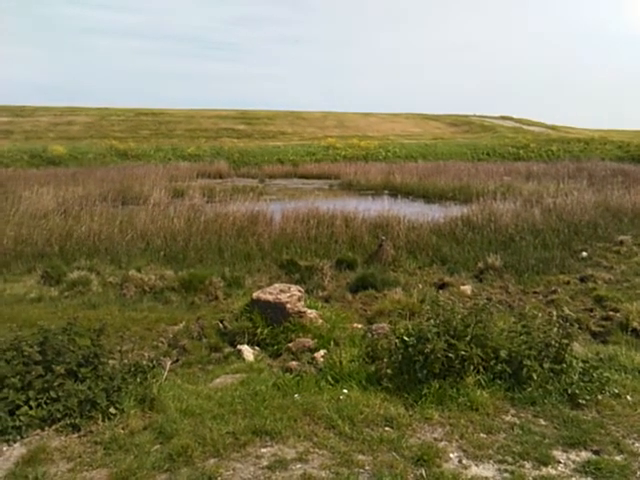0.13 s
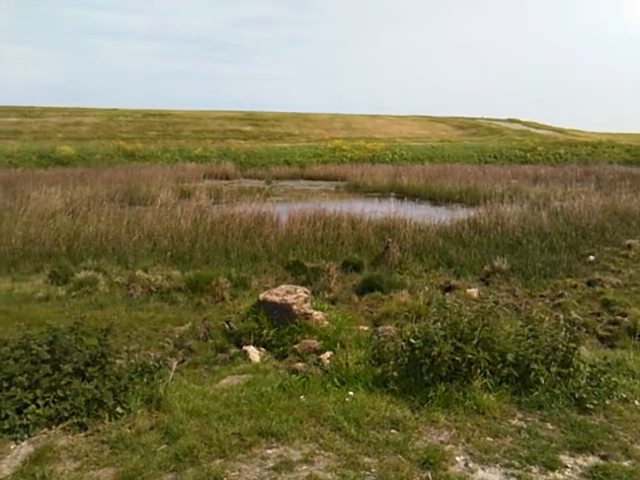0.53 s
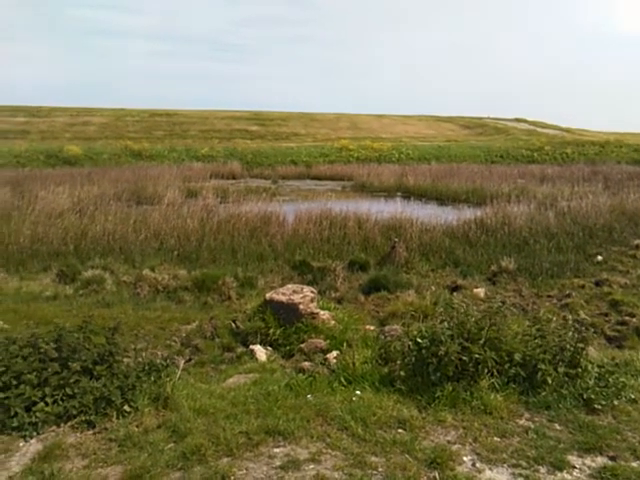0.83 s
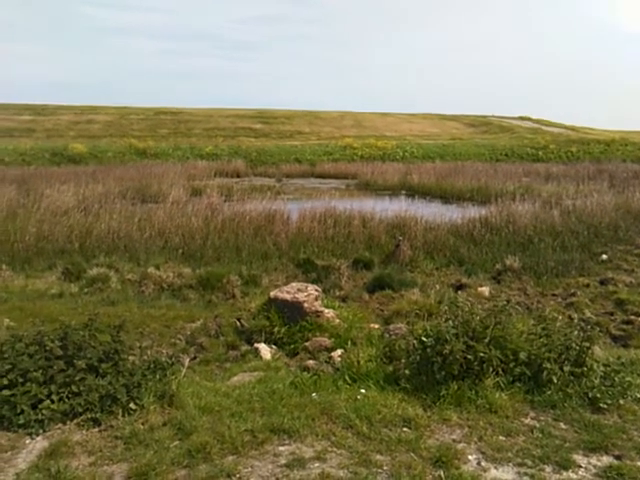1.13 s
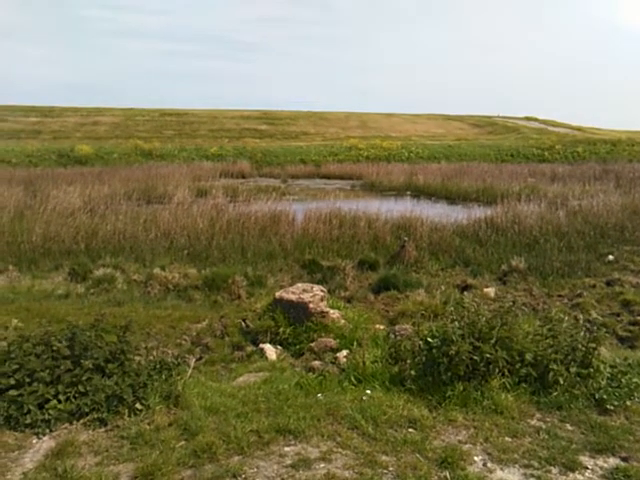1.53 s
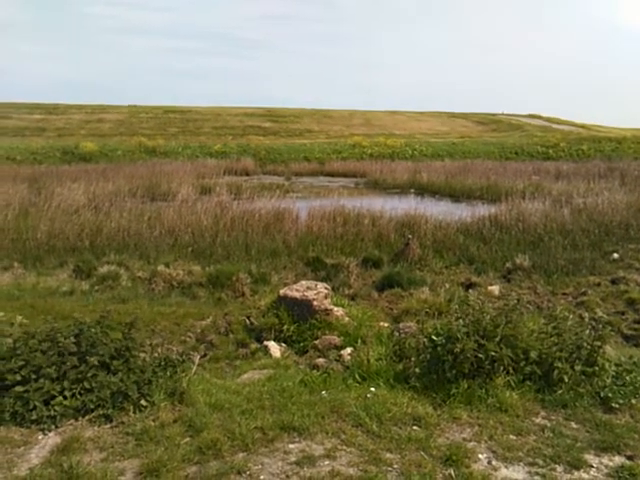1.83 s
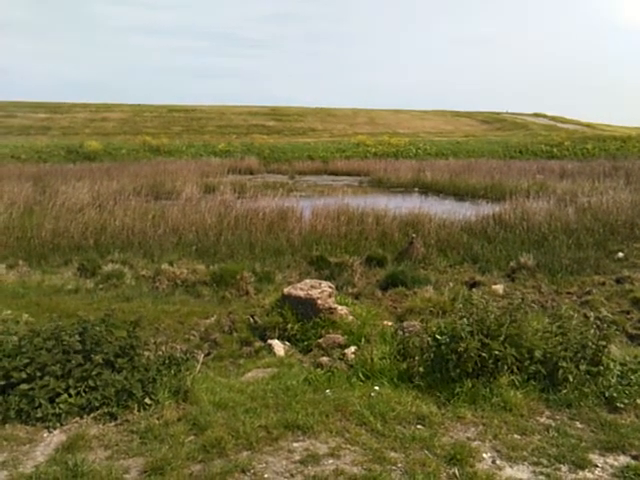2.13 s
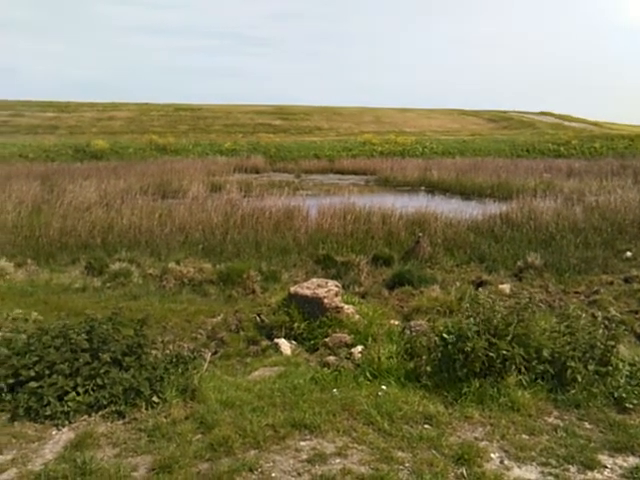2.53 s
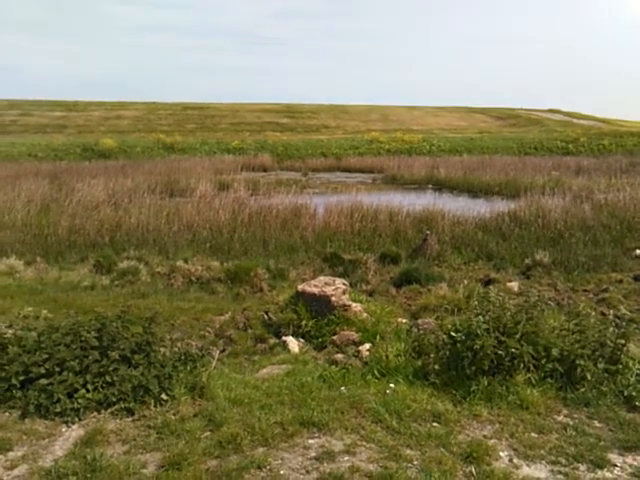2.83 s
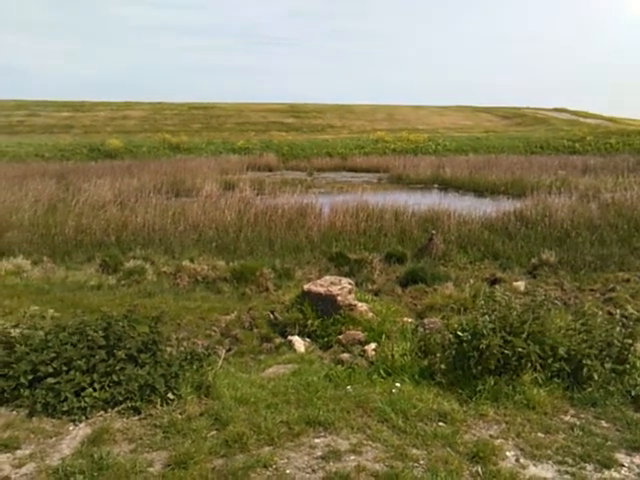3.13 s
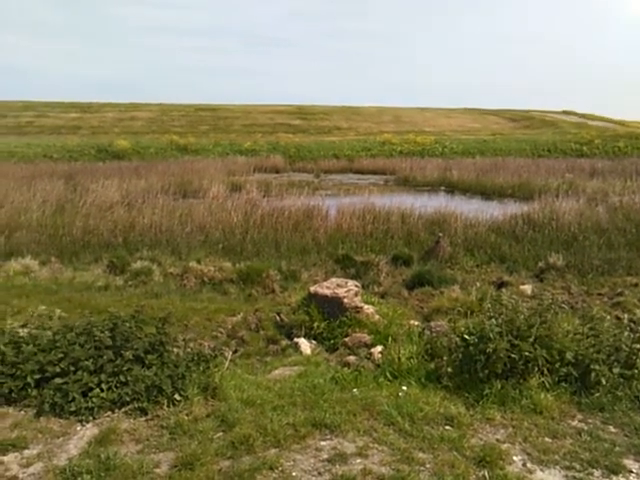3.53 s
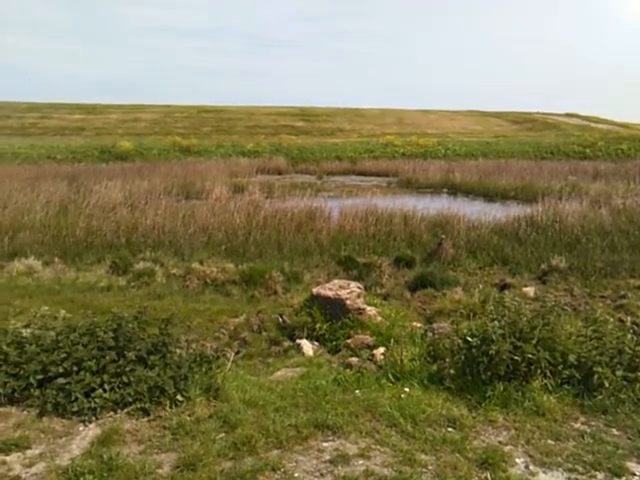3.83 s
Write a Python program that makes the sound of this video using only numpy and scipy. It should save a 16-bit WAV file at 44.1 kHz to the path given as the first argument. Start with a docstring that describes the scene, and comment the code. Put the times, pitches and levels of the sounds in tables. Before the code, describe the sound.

Frogs call at a marsh pond over a faint distant chorus, while loud wind rumbles and thumps on the microphone throughout, cracking at the start and at 0.8 seconds. Short quacks fill the first second and return around 3. Harsh, swelling croaks begin at 0.6 seconds, strongest and stuttering from 1.3 to 2.5. A bird whistles faintly near 2.1, 3.1 and 3.9 seconds, with faint rapid ticks around 3.7.

```python
"""Marsh frogs at a reedy pond, heard from a microphone out in the wind. Gusts buffet it from the start and
crack into overload twice in the first second, over a faint, distant chorus. Nearer frogs give a run of
short quacks, then longer croaks that swell and break into stutters: larynx pulses ringing the vocal sacs.
From two seconds on a small bird whistles thinly, and near the end comes a short run of faint ticks."""
import sys
import numpy as np
from scipy import signal
from scipy.fft import rfft, irfft
from scipy.io import wavfile
from scipy.ndimage import uniform_filter1d, minimum_filter1d, map_coordinates

SR = 44100
rng = np.random.default_rng(int(sys.argv[2]) if len(sys.argv) > 2 else 0)


def generate_wav(signal):
    """Clip the signal to [-1, 1] and save it as 16-bit WAV at the path in sys.argv[1]."""
    frames = np.transpose(np.atleast_2d(signal))
    scaled = np.clip(frames, -1, 1) * 32767
    pcm = np.round(scaled).astype(np.int16)
    wavfile.write(sys.argv[1], SR, pcm)


N = 176400

# Sharp blows of wind on the microphone. Each row: start in seconds, relative level in dB.
BUFFET_HITS = [(0.016, 2.5), (0.103, -15), (0.282, -11.5), (0.368, -10.5), (0.4, -15.5), (0.432, -29.5),
               (0.491, -19), (0.55, -15), (0.719, -16), (0.775, -21.5), (0.835, -9.5), (0.995, -12),
               (1.075, -18), (1.314, -12.5), (1.698, -10.5), (1.817, -16), (2.825, -7), (2.872, -17.5),
               (2.891, -7), (2.96, -9), (3.011, -12), (3.362, -25), (3.364, -12), (3.378, -15),
               (3.43, -22.5), (3.449, -11), (3.542, -15.5), (3.624, -12.5), (3.802, -39), (3.803, -10.5),
               (3.95, -17.5)]
LOWER_RING_S, UPPER_RING_S, SHOULDER_RING_S = 0.0007, 0.00065, 0.0005  # decay of the sac resonances


def amp(db):
    """Decibels to gain."""
    return 10 ** (np.asarray(db) / 20)


def unit(x):
    """Scale to rms 1."""
    return x / np.sqrt(np.mean(x ** 2) + 1e-20)


def clock(length):
    """Sample times over a length in seconds."""
    return np.arange(int(length * SR)) / SR


def add(out, start, x):
    """Mix x into out at a start in seconds."""
    i = max(0, round(start * SR))
    out[i:i + len(x)] += x[:max(0, len(out) - i)]


def noise(spectrum):
    """Noise of rms 1, coloured by (Hz, dB) rows."""
    hz, db = np.transpose(spectrum)
    gain = amp(np.interp(np.log(np.fft.rfftfreq(N, 1 / SR) + 1), np.log(hz), db))
    return unit(irfft(rfft(rng.standard_normal(N)) * gain, N))


def even_noise(spectrum, span_s):
    """Coloured noise whose strength is held even over spans of span_s."""
    x = noise(spectrum)
    power = uniform_filter1d(np.abs(signal.hilbert(x)) ** 2, int(span_s * SR))
    return unit(x / np.sqrt(np.abs(power) + 1e-3))


def gate(t, attack_s=0.012, release_s=0.016):
    """Smooth attack, hold and release."""
    attack = np.sin(np.pi / 2 * np.clip(t / attack_s, 0, 1))
    return attack * np.sin(np.pi / 2 * np.clip((t[-1] - t) / release_s, 0, 1))


def wind(rise_s=0.011, fall_s=0.041, lull_db=-40, eddy_growth=1.77):
    """Gusts on the microphone: rumble follows the pressure, finer eddies grow faster and flicker."""
    # Each row: start in seconds, length in seconds, level in dB.
    gusts = [(-.02, 0.62, -14.5), (0.581, 0.099, -31.5), (0.645, 0.31, -14.5), (0.958, 0.24, -18.5),
             (1.259, 0.077, -13.5), (1.338, 0.12, -19), (1.566, 0.32, -15), (1.874, 0.28, -26),
             (2.007, 0.062, -9.5), (2.287, 0.053, -28.5), (2.529, 0.12, -17), (2.644, 0.13, -25.5),
             (2.76, 0.32, -12.5), (3.066, 0.26, -19.5), (3.341, 0.19, -17), (3.509, 0.28, -19),
             (3.79, 0.26, -15.5)]
    # Spectra of the rumble, the eddies and their flicker. Each row: frequency in Hz, level in dB.
    rumble_spectrum = [(22, -32.5), (45, -1), (70, 1.5), (170, -8), (280, -17.5), (450, -29), (2000, -110)]
    eddy_spectrum = [(60, -26.5), (200, 3), (450, -5), (900, -17), (4000, -79)]
    flicker_spectrum = [(80, -3), (200, -14.5), (2000, -100)]
    power, t = np.full(N, amp(lull_db) ** 2), np.arange(N) / SR
    for start, length, db in gusts:
        envelope = np.clip((t - start) / rise_s, 0, 1) * np.clip((start + length - t) / fall_s, 0, 1)
        power += (amp(db) * envelope) ** 2
    pressure_db = 10 * np.log10(power)
    rumble = amp(pressure_db) * even_noise(rumble_spectrum, span_s=0.059)
    eddy_db = pressure_db.max() - 12.5 + eddy_growth * (pressure_db - pressure_db.max())
    eddies = unit(noise(eddy_spectrum) * amp(7 * noise(flicker_spectrum)))
    return rumble + amp(eddy_db) * eddies


def air():
    """A faint, steady open-air hiss."""
    # Each row: frequency in Hz, relative level in dB.
    spectrum = [(500, 0), (1000, 2), (2800, -34), (6500, -24.5), (8500, -19.5), (15500, -27)]
    return amp(-54.5) * noise(spectrum)


def pulses(t, rate_hz, rough):
    """Times and sizes of larynx pulses; the rate wanders, and roughness makes both uneven."""
    wander = 1 + 0.044 * map_coordinates(rng.standard_normal(32), [t * 60], mode="mirror")
    cycles = np.floor(np.cumsum(rate_hz * wander) / SR)
    times = np.flatnonzero(np.diff(cycles, prepend=-1)) / SR
    jitter, shimmer = rough * rng.standard_normal((256, 2))[:len(times)].T
    return np.abs(times + 0.00023 * jitter), amp(7 * shimmer)


def ring(train, t, hz, ring_s):
    """Each pulse rings one resonance of the vocal sacs, at the frequency it has just then."""
    times, sizes = train
    index = (times * SR).astype(int)[:, None] + 1 + np.arange(SR // 150)
    age = index / SR - times[:, None]
    pulse_hz = np.interp(times, t, np.broadcast_to(hz, t.shape))[:, None]
    grains = sizes[:, None] * age / ring_s * np.exp(-age / ring_s) * np.sin(2 * np.pi * pulse_hz * age)
    return unit(np.bincount(index.ravel(), grains.ravel(), len(t))[:len(t)])


def far_frogs(count=48):
    """Many frogs far off, each with its own size and gliding pulse rate."""
    # Loudness of the chorus. Each row: time in seconds, level in dB.
    levels = [(0.0, -49.5), (1.97, -41), (3.0, -51.5), (4.0, -55.5)]
    out = np.zeros(N + SR)
    for slot, (offset, length, pitch, glide, body) in enumerate(rng.uniform(-1, 1, (count, 5))):
        t = clock(0.14 * 2 ** (0.5 * length))
        train = pulses(t, 370 * 2 ** (0.36 * pitch + 0.5 * glide * t / t[-1]), rough=0.25)
        scale = 2 ** (0.32 * body)
        lower = ring(train, t, 1450 * scale, LOWER_RING_S)
        upper = amp(-19.5) * ring(train, t, 3700 * scale, LOWER_RING_S)
        add(out, (slot + 1 + offset) / count * (N / SR + 0.5), (lower + upper) * np.hanning(len(t)))
    level_db = np.interp(np.arange(N) / SR, *np.transpose(levels))
    return unit(out[SR // 2:][:N]) * amp(level_db)


def buffets(rise_s=0.0014, fall_s=0.0089):
    """Each sharp blow of wind hits the microphone with a burst of low noise."""
    # Each row: frequency in Hz, relative level in dB.
    spectrum = [(40, -7), (150, 9), (450, -1), (1100, -22.5), (1800, -42), (9000, -124)]
    envelope, t = np.zeros(N), clock(0.15)
    for start, db in BUFFET_HITS:
        add(envelope, start, amp(db + 1) * (1 - np.exp(-t / rise_s)) * np.exp(-(t / fall_s) ** 0.89))
    return envelope * even_noise(spectrum, span_s=0.01)


def thumps(centre_s=0.003032, typical_width_s=0.00093):
    """At the heart of each buffet the pressure swings up and down once."""
    out, t = np.zeros(N), clock(0.03)
    onset = np.sin(np.pi / 2 * np.clip(t / centre_s, 0, 1)) ** 2
    for start, db in BUFFET_HITS:
        widths = (t - centre_s) / (typical_width_s * np.exp(0.17 * rng.standard_normal()))
        swing = -widths / (1 + widths ** 2) ** 2 * onset
        add(out, start, amp(db + 4) * swing / np.abs(swing).max())
    return out


def cracks(corner_hz=860, rise_s=0.00007):
    """The wind overloads the microphone with a one-sided spike."""
    # Each row: start in seconds, relative level in dB.
    overloads = [(.0195, 10.5), (0.8395, -0.5)]
    out, t = np.zeros(N), clock(0.15)
    for start, db in overloads:
        add(out, start, -amp(db) * np.exp(-2 * np.pi * corner_hz * t) * (1 - np.exp(-t / rise_s)) ** 2)
    return out


def quacks(length_s=0.048):
    """Short, higher notes that rise and fade while pulse rate and resonances sag."""
    # Each row: middle in seconds, lower resonance's level in dB, upper resonance in Hz, its level in dB.
    calls = [(.095,-41.5,4300,-54.5), (0.193,-40,4210,-54), (0.287,-37.5,4190,-51), (.378,-39,4160,-54.5),
             (.503,-43.5,4730,-50.5), (0.6,-42.5,4640,-45.5), (.688,-38.5,4810,-45), (.774,-39,4800,-40.5),
             (.861,-39,4680,-47), (.946,-41,4780,-45), (1.583,-35,4320,-45.5), (1.678,-33.5,4260,-49),
             (2.004,-32,4680,-58), (2.484,-37,4730,-49.5), (2.66,-37,4780,-51), (2.754,-36.5,4730,-38.5),
             (2.864,-36,4400,-45.5), (2.96,-34,4390,-40.5), (3.05,-29.5,4290,-33.5), (3.141,-32,4310,-43.5),
             (3.241,-36,4240,-48.5)]
    out, t = np.zeros(N), clock(length_s)
    sag = 0.25 * (0.5 - t / length_s)
    envelope = np.hanning(len(t)) ** 0.69
    for middle, lower_db, upper_hz, upper_db in calls:
        lower_hz = 1777 * (upper_hz / 4440) ** 1.75  # the two resonances rise together
        train = pulses(t, 388 * (1 + sag + 0.1 * rng.standard_normal()), rough=0.41)
        lower = ring(train, t, lower_hz * (1 + sag), LOWER_RING_S)
        lower += amp(-30.5) * ring(train, t, 1935, SHOULDER_RING_S)
        upper = ring(train, t, upper_hz * (1 + 0.28 * sag), UPPER_RING_S)
        upper += amp(-10) * ring(train, t, 0.74 * upper_hz, SHOULDER_RING_S)
        voice = amp(lower_db) * lower + amp(upper_db) * upper
        add(out, middle - length_s / 2, scattered(envelope * voice))
    return out


def croak_voice(t, upper_hz, glide, rate_hz, lower_hz, rough, settle_s=0.05):
    """One pulse train through the sacs; its rate and both main resonances settle downward."""
    # Weak resonances between the main two. Each row: frequency in Hz, relative level in dB.
    shoulders = [(1850, -10.5), (2280, -20), (3150, -23)]
    excess = glide * np.exp(-t / settle_s)
    train = pulses(t, rate_hz * (1 + excess), rough)
    lower = ring(train, t, lower_hz * (1 + excess), LOWER_RING_S)
    upper = ring(train, t, upper_hz * (1 + 0.55 * excess), UPPER_RING_S)
    body = sum(amp(db) * ring(train, t, hz, SHOULDER_RING_S) for hz, db in shoulders)
    return gate(t) * (lower + body + amp(-18.5) * upper)


def croaks():
    """Long calls from the nearer frogs; most swell, a few fade."""
    # Each row: start in seconds, length in seconds, level at the louder end in dB, swell in dB,
    # upper resonance in Hz, opening glide as a fraction.
    calls = [(0.623,0.14,-35,13.5,3950,.05), (0.851,0.11,-32,3,3850,.15), (0.963,0.17,-34,-6,3390,0.031),
             (1.183,.12,-36,14,3800,0.42), (1.276,0.12,-25,13,3670,0.23), (1.456,.25,-33,-10,3660,.08),
             (1.744,0.15,-24.5,11,3860,0.34), (1.93,0.19,-31.5,5,4430,0.045), (2.207,0.11,-27,28,4200,.14),
             (2.465,0.17,-35.5,-2,3420,0.11), (2.711,0.46,-38,2,3490,0.027), (3.51,0.17,-34.5,12.5,4600,.1)]
    out = np.zeros(N)
    for start, length, db, swell_db, upper_hz, glide in calls:
        t = clock(length)
        voice = croak_voice(t, upper_hz, glide, rate_hz=275, lower_hz=1433, rough=0.45)
        envelope = amp(db + swell_db * t / length - max(swell_db, 0))
        add(out, start, scattered(voice * envelope))
    return out


def stutters():
    """The short, slower-pulsed bursts that end a croak."""
    # Each row: start in seconds, length in seconds, level in dB, upper resonance in Hz.
    bursts = [(1.392, 0.047, -26, 3800), (1.429, 0.052, -33.5, 4130), (1.897, 0.037, -27, 3720),
              (2.121, 0.035, -28.5, 3980), (2.324, 0.034, -30.5, 3900), (2.373, 0.04, -29.5, 3900),
              (2.425, .016, -29, 4020), (2.444, 0.016, -28, 3930), (2.553, 0.052, -32, 4450),
              (3.671, 0.033, -29.5, 4200)]
    out = np.zeros(N)
    for start, length, db, upper_hz in bursts:
        voice = croak_voice(clock(length), upper_hz, glide=0.044, rate_hz=237.5, lower_hz=1492, rough=0.46)
        add(out, start, amp(db) * scattered(voice))
    return out


def bird(fall_hz=440):
    """A small bird's thin, falling whistles."""
    # Each row: start in seconds, length in seconds, level in dB, opening pitch in Hz.
    whistles = [(2.135, 0.24, -67.5, 5570), (3.066, 0.043, -57, 5500), (3.927, 0.067, -52, 5380)]
    out = np.zeros(N)
    for start, length, db, first_hz in whistles:
        t = clock(length)
        hz = first_hz - fall_hz * t / length
        add(out, start, amp(db) * np.sqrt(2) * gate(t) * np.sin(2 * np.pi * np.cumsum(hz) / SR))
    return out


def ticking(start_s=3.612, end_s=3.86, rate_hz=50, decay_s=0.0027):
    """A short run of faint, bright ticks."""
    # Each row: frequency in Hz, relative level in dB.
    spectrum = [(1500, -4), (3000, -11.5), (15000, -11.5)]
    t = np.arange(N) / SR
    age = (t - start_s) % (1 / rate_hz)
    return amp(-48.5) * noise(spectrum) * np.exp(-age / decay_s) * (t > start_s) * (t < end_s)


def scattered(call, decay_s=0.003):
    """A call blurred and coloured by its own short paths through the reeds."""
    t = clock(4 * decay_s)
    paths = rng.standard_normal(2048)[:len(t)] * np.exp(-t / decay_s)
    heard = signal.fftconvolve(call, (t == 0) + paths / np.linalg.norm(paths))
    return heard * np.linalg.norm(call) / np.linalg.norm(heard)


def reeds(x, t60_s=0.25):
    """Reeds and banks add a weak, short tail."""
    t = clock(0.5)
    tail = rng.standard_normal(len(t)) * amp(-60 * t / t60_s)
    return x + amp(-12) * signal.fftconvolve(x, tail / np.linalg.norm(tail))[:N]


def scene():
    """The pond's voices, near and far, with wind right on the microphone."""
    # The frogs' band: lower and upper edge in Hz.
    edges_hz = [1130, 4570]
    band = signal.butter(4, edges_hz, "bandpass", fs=SR, output="sos")
    frogs = signal.sosfilt(band, croaks() + stutters() + quacks() + far_frogs())
    on_microphone = wind() + buffets() + thumps() + cracks()
    return (on_microphone + reeds(frogs + bird()) + ticking() + air())[None]


def record(dry, ceiling=0.97, buzz_threshold=0.18, top_hz=15700):
    """A limiter holds down the gusts, whose peaks set off a faint high buzz; nothing passes top_hz."""
    # Each row: frequency in Hz, relative level in dB.
    buzz_spectrum = [(5000, -55), (6000, 7), (7200, -31), (10800, -34), (12000, 1), (13300, -37.5)]
    span = SR // 250  # 4 ms
    needed_gain = np.minimum(1, ceiling / (np.abs(dry) + 1e-9))
    held_gain = minimum_filter1d(needed_gain, 2 * span)
    limited = dry * uniform_filter1d(uniform_filter1d(held_gain, span), span)
    overload = uniform_filter1d(np.maximum(np.abs(limited) - buzz_threshold, 0), span)
    out = limited + amp(-42.5) * overload * noise(buzz_spectrum)
    return irfft(rfft(out) * (np.fft.rfftfreq(N, 1 / SR) < top_hz), N)


dry = scene()
out = record(dry)
generate_wav(out)
```